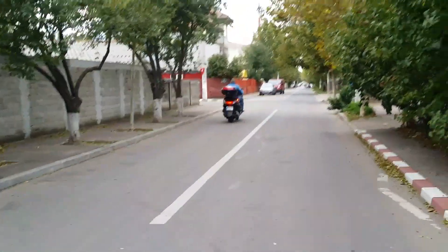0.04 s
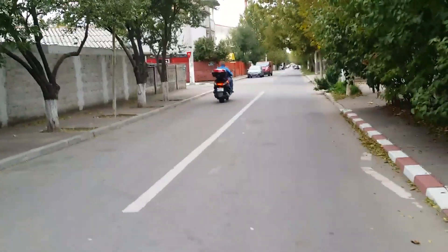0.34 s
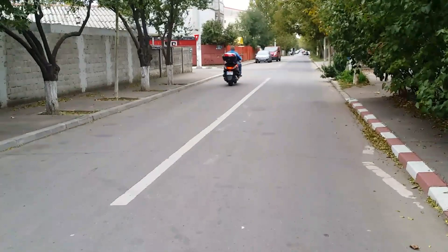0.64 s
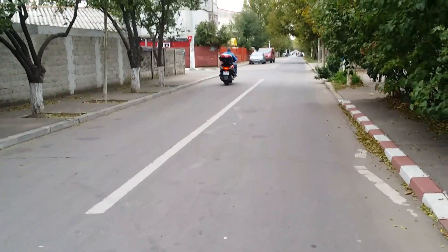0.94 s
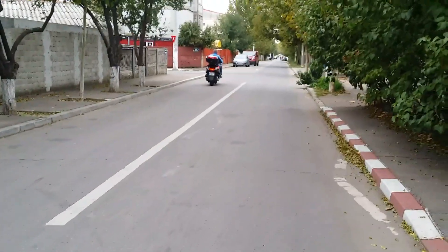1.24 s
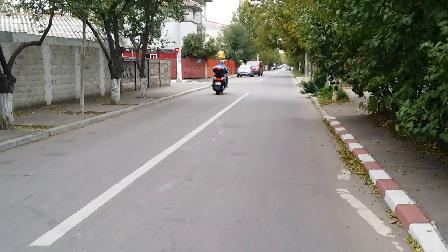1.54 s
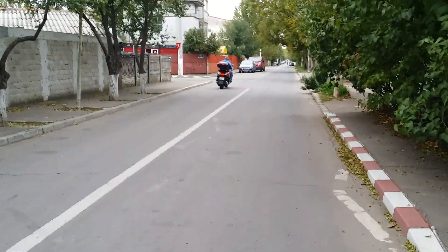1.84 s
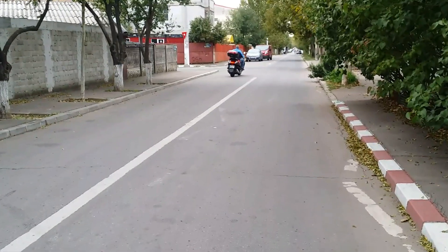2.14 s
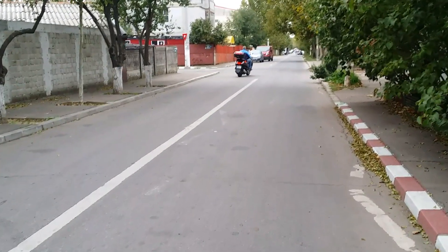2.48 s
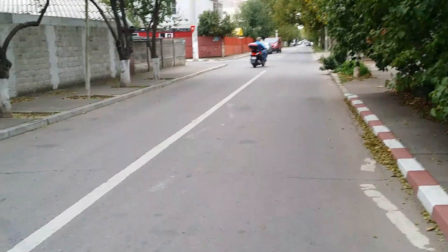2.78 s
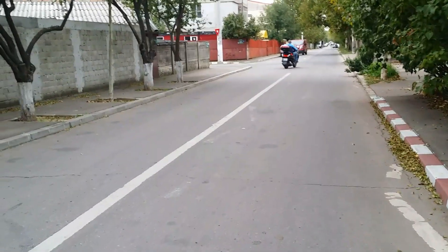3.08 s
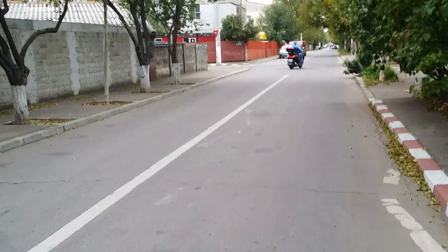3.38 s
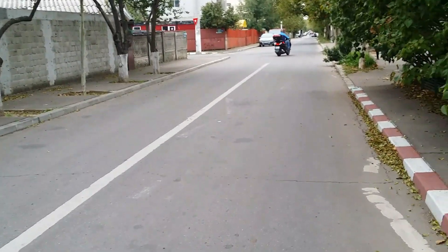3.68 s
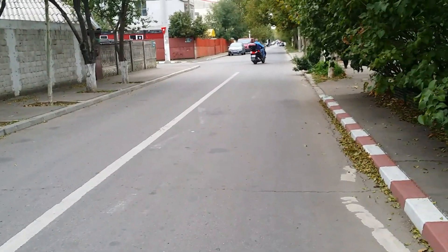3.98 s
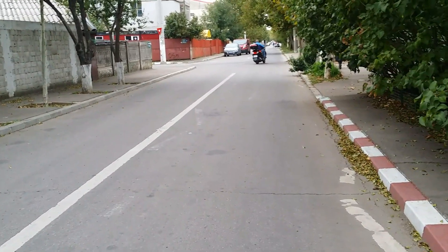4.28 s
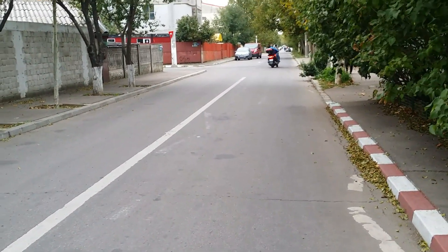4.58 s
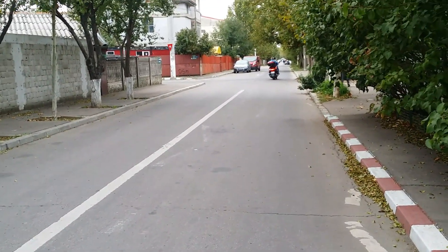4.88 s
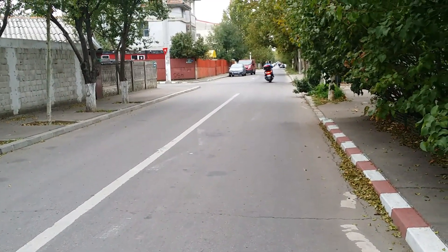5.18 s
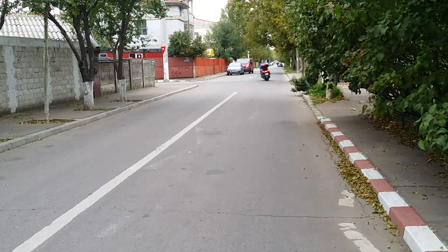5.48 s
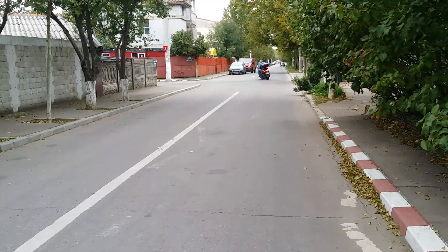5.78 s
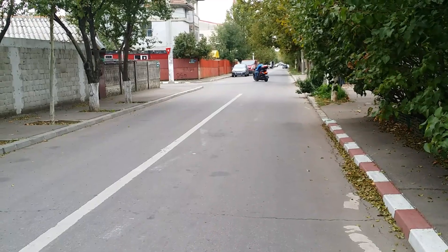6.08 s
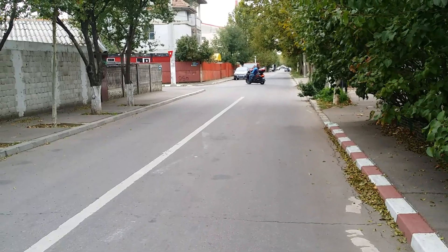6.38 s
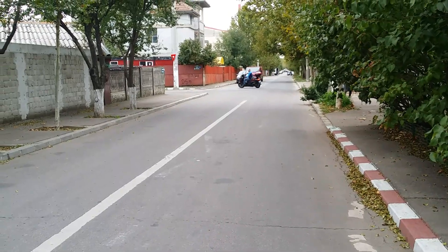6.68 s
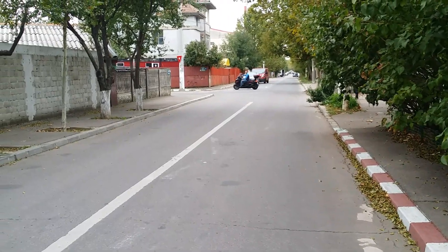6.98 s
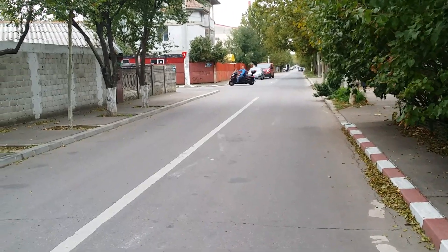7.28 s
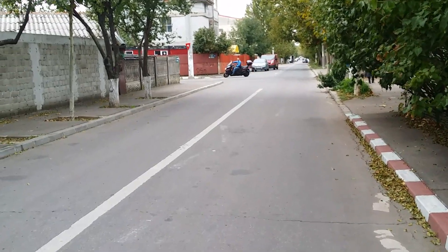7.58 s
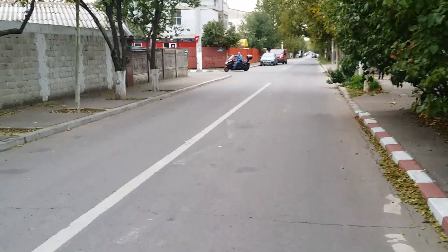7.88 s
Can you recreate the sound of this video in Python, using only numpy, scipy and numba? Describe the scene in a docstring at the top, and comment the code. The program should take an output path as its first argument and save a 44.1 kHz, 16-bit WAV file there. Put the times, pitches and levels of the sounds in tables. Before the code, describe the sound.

A single-cylinder scooter with an open exhaust rolls away along a walled street, heard from behind and slightly to the right. From the start it putters loudly, about sixteen separate pops a second, each a deep thump with a raspy bark and occasional sharper cracks. Faint valve ticks are audible early on. At about 2.5 seconds a throttle blip lifts the pitch with a cluster of bangs, then the engine slows and softens. A second blip bangs at about 4 seconds. From 4.5 to 6.5 seconds it settles into a slower, thinner, hollow chug farther off. A third blip cracks at about 6.7 seconds and falls away; the sound brightens and picks up slightly toward 8 seconds as the scooter begins turning. Walls and houses return short echoes with a soft tail throughout, over a whirr of drive and tyres and faint distant traffic.

```python
"""A single-cylinder scooter with an open exhaust rolls away down a walled street and starts to turn.
Every firing is a separate pop: a deep thump of gas, a bark from the ringing pipe and a rasp at its
mouth. Three blips of the throttle make it bang. Walls, a fence and houses throw each pop back, with
delays that shift as it rides, and trees scatter a soft tail. Underneath, the valves tick, the intake
gulps air, the drive, fan and tyres whirr, and far traffic rumbles."""
import sys
import numpy as np
from scipy import signal
from scipy.fft import rfft, irfft
from scipy.io import wavfile
from numba import njit

SR = 44100
rng = np.random.default_rng(int(sys.argv[2]) if len(sys.argv) > 2 else 0)


def int16_out(signal):
    """Quantize to a 16-bit WAV file."""
    q = np.round(np.clip(np.atleast_2d(signal).T, -1, 1) * 32767)
    wavfile.write(sys.argv[1], SR, q.astype(np.int16))


N = 354123
TIME = np.arange(N) / SR
MS = 1 / 1000
EAR_GAP_MS = 0.45   # time sound takes from one ear to the other


def from_db(db):
    """Turn decibels into a gain."""
    return 10 ** (np.asarray(db) / 20)


def rms_one(x):
    """Scale a signal to an average power of 1."""
    return x / np.sqrt(np.mean(x ** 2) + 1e-20)


def in_time(rows, at=TIME):
    """Glide between a table's rows: one curve for each column after the time."""
    seconds, *columns = np.transpose(rows)
    return [np.interp(at, seconds, column) for column in columns]


def cut(x, hz, kind, order=2):
    """Keep the "low" or the "high" side of a frequency."""
    return signal.sosfilt(signal.butter(order, min(hz, .45 * SR), kind, fs=SR, output="sos"), x + 1e-18)


def resonate(x, hz, width_hz):
    """One resonance, with a gain of 1 at its peak."""
    r = np.exp(-np.pi * width_hz / SR)
    feedback = [1, -2 * r * np.cos(2 * np.pi * hz / SR), r * r]
    return signal.lfilter(np.array([1, 0, -1]) * (1 - r * r) / 2, feedback, x + 1e-18)


@njit
def gliding_filter(x, tuning, damping):
    """A filter whose pitch may move; returns the band at that pitch and the highs above it."""
    band, high, a, b = np.zeros(len(x)), np.zeros(len(x)), 0., 0.
    for i in range(len(x)):
        g = tuning[i]
        high[i] = (x[i] - (damping + g) * a - b) / (1 + g * (damping + g))
        band[i] = a + g * high[i]
        a, b = a + 2 * g * high[i], b + 2 * g * band[i]
    return damping * band, high


def noise(spectrum):
    """Noise of a given tone colour, with a power of 1."""
    hz, db = np.transpose(spectrum)
    colour = from_db(np.interp(np.log(np.fft.rfftfreq(N, 1 / SR) + 1), np.log(hz), db))
    return rms_one(irfft(rfft(rng.standard_normal(N)) * colour, N))


def stereo_noise(spectrum):
    """A separate noise for each ear."""
    return np.array([noise(spectrum), noise(spectrum)])


def delayed(x, ms):
    """Play a signal late by a steady or moving delay."""
    return np.interp(TIME - ms * MS, TIME, x, left=0)


def clicks(times, sizes):
    """One sample of the given size at each time."""
    return np.bincount(np.clip(times * SR, 0, N - 1).astype(int), sizes, N)


def bursts(kicks, decay_ms):
    """A level that jumps at each click and dies away."""
    return signal.lfilter([1], [1, -np.exp(-1 / (decay_ms * MS * SR))], kicks + 1e-18)


# The colour of far traffic. Each row: frequency in Hz, relative level in dB.
TRAFFIC_COLOUR = [(20, 0.5), (40, -6), (70, 3.5), (150, -5), (400, 10.5), (1500, -59)]

def traffic(level_db=-42.0):
    """Far traffic makes a steady, low rumble."""
    return from_db(level_db) * noise(TRAFFIC_COLOUR)


# Brief hisses. Each row: middle and half length in seconds, level in dB, pitch and width in Hz.
HISSES = [(0.204, 0.041, -38, 12100, 7000), (1.547, 0.2, -47.5, 3440, 1800), (7.067, 0.016, -34, 1300, 500),
          (7.08, .04, -48, 2800, 2000), (7.533, 0.082, -48.5, 5500, 6500)]

def swishes():
    """Bands of hiss swell and fade."""
    hiss, out = rng.standard_normal((2, N)), 0
    for middle_s, half_s, db, hz, width_hz in HISSES:
        swell = np.exp(-((TIME - middle_s) / half_s) ** 2)
        band = rms_one(resonate(resonate(hiss, hz, width_hz), hz, width_hz))
        out = out + from_db(db) * swell * band
    return out


# The colour of the whirr. Each row: frequency in Hz, relative level in dB.
WHIRR_COLOUR = [(250, -1), (420, 10.5), (680, 12), (950, 13), (1200, 5.5), (1500, 3), (2200, 6),
                (3100, -7.5), (6600, -8.5), (9000, -6), (12000, -10.5), (15500, -16.5)]

def whirr(base_db=-28.0, follow=1.67):
    """Drive, fan and tyres whirr louder as the engine works harder."""
    return from_db(base_db + follow * in_time(ENGINE_EFFORT)[0]) * stereo_noise(WHIRR_COLOUR)


# How hollow the street sounds. Each row: time in seconds, depth of the dips from 0 to 1.
HOLLOWNESS = [(0, 0), (2.6, 0.01), (2.8, 0.47), (3.9, 0.38), (4.15, 0), (4.4, 0.43), (6.5, 0.64), (6.7, .2),
              (7.2, 0.3), (7.6, 0.1)]
# The dips in the tone. Each row: frequency in Hz, width in Hz.
HOLLOW_DIPS = [(462, 100), (990, 150), (1500, 160)]

def hollowed(x):
    """The sound turns hollow while the scooter is far down the street."""
    depth, = in_time(HOLLOWNESS)
    for hz, width_hz in HOLLOW_DIPS:
        x = x - depth * resonate(x, hz, width_hz)
    return x


def afterglow(times, level_db, t60, build_ms=3.0):
    """The level of each pop's tail among the trees: it builds, then falls 60 dB in t60 seconds."""
    decay_ms = t60 / MS / np.log(1e6)
    power = bursts(bursts(clicks(times, from_db(level_db) ** 2), decay_ms), build_ms)
    return np.sqrt(power / (build_ms * MS * SR))


def foliage(x, t60, build_ms=12.0, ear_gap_ms=0.44, directions=7, block=8192):
    """Trees and fences scatter a tail from all sides; it changes as the scooter moves on."""
    t, field, out = TIME[:SR], 0, np.zeros((2, N + 2 * SR))
    envelope = from_db(-60 * t / t60) * (1 - np.exp(-(t / (build_ms * MS)) ** 2))
    # each direction has its own lag between the ears
    for lag in np.linspace(-1, 1, directions) * ear_gap_ms * MS * SR / 2:
        arrivals = rng.standard_normal(N + SR)
        field = field + np.array([np.roll(arrivals, -int(lag)), np.roll(arrivals, int(lag))])
    for i in range(0, N, block):
        echoes = rms_one(envelope * field[:, i:i + SR]) / np.sqrt(SR)
        tail = signal.fftconvolve(x[None, i:i + block], echoes, axes=1)
        out[:, i:i + tail.shape[1]] += tail
    return out[:, :N]


def scatter(thumps, times, sharp_db, bass_db=-1.5, hiss_db=-29.5):
    """Tails of the thump and the rasp: leaves scatter little deep bass and soak up most treble."""
    bass = cut(cut(foliage(thumps, t60=0.63), 130.0, "high"), 363.0, "low", order=8)
    hiss = stereo_noise(RASP_COLOUR) * afterglow(times, sharp_db + hiss_db, t60=0.77)
    return from_db(bass_db) * bass + hiss


# The echo off the house ahead. Each row: time in seconds, delay in milliseconds, gain in dB.
END_HOUSE_ECHO = [(0, 103, -21), (2.6, 86, -16), (4.12, 77, -22), (4.18, 76, -3), (4.4, 79, -11),
                  (5.1, 64, -12), (6.6, 41.5, -14.5), (7.1, 37, -18.5)]

def house_ahead(x):
    """The house at the end of the street sends back a thin slap, sooner as the scooter nears it."""
    delay_ms, db = in_time(END_HOUSE_ECHO)
    thin = resonate(cut(x, 647.0, "high", order=4), hz=900.0, width_hz=900.0)
    return from_db(db) * delayed(thin, delay_ms)


# Four echoes from the sides. Each row: time in seconds, delay in milliseconds, gain in dB.
WALL_ECHO = [(0.0, 9.4, -3), (1.2, 8.8, 1.3), (2.4, 7.3, 0.6), (3.6, 6.46, -1.5), (4.0, 7.9, -15),
             (4.4, 7.7, -2.5), (4.8, 8, 0), (5.7, 6.97, -2), (6.3, 5.2, -14.5), (6.9, 3.88, -8.5),
             (8.03, 6.3, -11)]
FENCE_ECHO = [(0.0, 29.46, -2.5), (1.2, 24.4, -5.5), (2.4, 20.64, -5.5), (3.6, 19.76, -7),
              (4.5, 19.84, -12), (5.0, 22.6, -5.5), (6.0, 21.26, -4.5), (6.9, 22, -6), (7.4, 24.13, 0),
              (8.03, 26.7, -7.5)]
HOUSES_ECHO = [(0.0, 40.84, -11.5), (1.2, 37.45, -4.5), (2.4, 33.55, -9.5), (3.6, 27.62, -5),
               (4.5, 23.28, -4), (5.5, 26.03, -16.5), (6.9, 26.35, -7), (8.03, 30.9, -9)]
SIDE_STREET_ECHO = [(4.4, 41.5, -14), (4.8, 38.4, -6), (6.4, 36.3, -10), (7.0, 38, -13), (8.03, 42.7, -8.5)]

def street_echoes(low, mid, high, mid_db=-3.5, high_db=-2.5):
    """The detour by each wall changes as the scooter rides; rough surfaces return less treble."""
    sound, out = low + from_db(mid_db) * mid + from_db(high_db) * high, 0
    walls = (WALL_ECHO, -0.42), (FENCE_ECHO, 0.47), (HOUSES_ECHO, 0.65), (SIDE_STREET_ECHO, -0.39)
    for wall, side in walls:   # side runs from -1 (left) to 1 (right)
        delay_ms, db = in_time(wall)
        ears = [delayed(sound, delay_ms + ear * side * EAR_GAP_MS / 2) for ear in (1, -1)]
        out = out + from_db(db) * np.array(ears)
    return out


# The fence's bright echo. Each row: time in seconds, bark gain in dB, rasp gain in dB.
FENCE_SLAP = [(6.6, -44, -38), (6.869, -6, -7), (7.45, -13, 6), (8.03, 3, 6)]

def fence_slap(mid, high):
    """In the turn the pipe points at the fence, which slaps its treble back."""
    mid_db, high_db = in_time(FENCE_SLAP)
    sound = from_db(mid_db) * mid + from_db(high_db) * high
    delay_ms = in_time(FENCE_ECHO)[0]
    return np.array([delayed(sound, delay_ms + EAR_GAP_MS / 4), delayed(sound, delay_ms)])


# How far off the scooter sounds: higher values thin the thump, blunt the bark and fade the ticks.
# Each row: time in seconds, farness as a plain number.
FARNESS = [(0, 18.8), (1.2, 20.3), (2.4, 19), (3.5, 32), (4.5, 47), (5.6, 54), (6.6, 43.6), (7.5, 30),
           (8.03, 31)]

def thinned(thumps, split_hz=190.0, tilt_db_per_step=0.284, neutral_farness=34.9):
    """The thump is deep nearby and grows thinner with distance."""
    deep = cut(thumps, split_hz, "low", order=1)
    tilt_db = tilt_db_per_step * (neutral_farness - in_time(FARNESS)[0])
    return from_db(tilt_db) * deep + from_db(-tilt_db) * (thumps - deep)


# The pitches at which the valve gear rings, in Hz.
VALVE_PITCHES = [9400, 10500, 11600, 12300, 13500]

def valves(times, level_db=-16.0, spread_db=7.0, width_hz=330.0, fade_db_per_step=5.1):
    """The valve gear ticks as each pop begins; the fine ring is soon lost with distance."""
    farness, = in_time(FARNESS, times)
    tick_db = level_db - fade_db_per_step * (farness - farness[0])
    chance_db = spread_db * np.clip(rng.standard_normal((len(times), len(VALVE_PITCHES))), -2, 2)
    ticks = sum(resonate(clicks(times, from_db(tick_db + luck_db)), hz, width_hz)
                for hz, luck_db in zip(VALVE_PITCHES, chance_db.T))
    return ticks * from_db([[1], [-1]])


# The intake is louder when the scooter is side-on. Each row: time in seconds, relative level in dB.
INTAKE_LEVEL = [(0, -35.5), (1.5, -42), (2.3, -47), (2.8, -65), (6.6, -58.5), (6.9, -44.5), (7.4, -39.5),
                (8.03, -34)]

def intake(times, hz=998.0, width_hz=470.0, decay_ms=7.9, lag_ms=2.4, trim_db=-6.0):
    """Each cycle draws a rough gulp of air through the air box."""
    gulps = rng.standard_normal(N) * bursts(clicks(times + lag_ms * MS, np.ones(len(times))), decay_ms)
    air_box = rms_one(resonate(resonate(gulps, hz, width_hz), hz, width_hz))
    return from_db(in_time(INTAKE_LEVEL)[0] + trim_db) * air_box


# The colour of the rasp. Each row: frequency in Hz, relative level in dB.
RASP_COLOUR = [(1500, -11), (2600, 4), (3900, 9), (5000, 6), (6600, 5.5), (9000, 1.5), (15500, -15)]

def rasp(times, level_db, snap_db=-12.5):
    """The jet of gas snaps and tears at the pipe's mouth for a few milliseconds."""
    kicks = clicks(times, from_db(level_db))
    envelope = bursts(kicks, decay_ms=5) + from_db(snap_db) * bursts(kicks, decay_ms=1)
    return stereo_noise(RASP_COLOUR) * envelope


def wavefront(times, level_db, gain_db=15.0):
    """The steep front of each pop leaves the mouth as a dry click, before the pipe rings."""
    fronts = clicks(times, from_db(level_db + gain_db))
    return -cut(cut(fronts, 600.0, "high"), 2690.0, "low", order=4)


# Hard pops and throttle bangs. Each row: start in seconds, thump strength in dB,
# bark strength in dB, pitch of the crack in Hz, crack strength in dB.
HARD_POPS = [(0.2542, -5.5, -25.5, 1660, -35), (0.373, -5, -24, 1710, -30), (0.4327, -6, -23, 1710, -25),
             (0.9219, -6, -22.5, 1690, -20), (1.103, -5, -23, 1600, -30), (1.352, -6.5, -22, 1720, -20),
             (1.592, -3.5, -20.5, 1627, -20), (1.831, -5.5, -24, 2100, -26),
             (1.9523, -5.5, -25, 1680, -20.5), (2.1321, -5, -24.5, 1685, -18.5),
             (2.3055, -5.5, -21, 1630, -22), (2.4235, -5.5, -15.5, 1740, -13),
             (2.474, -7.5, -14, 1900, -13), (2.524, -5.5, -16, 1736, -21), (2.5725, -6.5, -20, 1810, -17.5),
             (2.62, -8, -28, 700, -34), (2.9832, -11, -35, 1660, -34), (3.2241, -11.5, -31.5, 1280, -28),
             (3.4309, -11.5, -31.5, 1210, -31.5), (3.8455, -3.5, -26.5, 1170, -32),
             (3.7058, -6, -27.5, 1200, -25.5), (3.987, -2, -21, 1190, -18.5),
             (4.0472, -3.5, -12, 1230, -9.5), (4.0969, -3.5, -13, 1240, -17),
             (4.3646, -10, -30.5, 1300, -47), (6.2947, -7, -26, 1190, -26.5), (6.585, -5.5, -24, 1220, -20),
             (6.6519, -4.5, -20, 1770, -15), (6.7099, -2.5, -15, 1240, -14.5), (6.865, -10, -33, 700, -35)]

def crack(lag_ms=2.8, front_db=17.0, tail_db=-1.5, ring_db=37.5, top_hz=1120.0,
          snap_db=9, steepen=0.63, crackle_db=-22.0):
    """A hard pop's front rings briefly and washes down the street; the hardest steepen into a snap."""
    times, _, bark_db, pitch_hz, crack_db = np.transpose(HARD_POPS)
    times = times + lag_ms * MS
    fronts = clicks(times, from_db(bark_db))
    ring = sum(resonate(clicks(np.array([start]), from_db([db + ring_db])), hz, width_hz=113.0)
               for start, db, hz in zip(times, crack_db, pitch_hz))
    wash = rng.standard_normal((2, N)) * afterglow(times, bark_db + tail_db, t60=0.89)
    body = cut(cut(wash - from_db(front_db) * fronts, 347.0, "high"), top_hz, "low")
    shocks = clicks(times, from_db(snap_db + crack_db + steepen * (crack_db - crack_db.max())))
    crackle = from_db(crackle_db) * rng.standard_normal((2, N)) * bursts(shocks, decay_ms=4.6)
    snap = cut(cut(shocks + crackle, 2500.0, "high"), 7360.0, "low", order=4)
    return body - cut(ring, 2 * top_hz, "low") - snap


def pipe_ring(x, tuning, damping):
    """One resonance of the pipe, filtered twice so little sound gets past on either side."""
    return gliding_filter(gliding_filter(x + 1e-18, tuning, damping)[0], tuning, 2 * damping)[0]


# The pipe's resonances. Each row: base pitch in Hz, width in Hz, relative level in dB.
PIPE_RINGS = [(500, 147, 4.5), (591.6, 123, 2.5), (713, 111, 4), (848, 95, -7), (1203, 294, -2),
              (1710, 380, -4.5), (2330, 176, -9)]
# Hot gas raises the pipe's pitch; on a shut throttle its third resonance rings hollow.
# Each row: time in seconds, pitch multiplier, boost of that resonance in dB.
PIPE_DRIFT = [(0, 0.97, 0.5), (.55, 0.89, 5), (1.1, 0.96, -6), (2.2, 0.96, 2.5), (2.42, 1.03, -2),
              (2.48, 0.97, 5), (2.53, 0.987, 2), (2.9, 0.96, 9), (3.6, 1.044, -3), (4.1, 0.96, 4),
              (4.5, 0.975, 3.5), (5.2, 1.03, -4.5), (6.4, 0.97, 0.5), (7.1, 0.96, 1), (8.03, 0.89, -4.5)]

def bark(times, thump_db, bark_db, lowest_db, front_db=34.5, low_swirl_db=6.0, high_swirl_db=13.5,
         follow=0.49, slug_db=-6.5, tail_db=1.0, blunt_db_per_step=0.9, top_hz=3150.0):
    """A steep front and the swirling gas behind it ring the pipe; returns the bark and its tail."""
    gas, direct, tail = rng.standard_normal(N), 0, 0
    left, right, shared = rng.standard_normal((3, N))
    pitch_ratio, hollow_db = in_time(PIPE_DRIFT)[0], in_time(PIPE_DRIFT, times)[1]
    # the low resonances also follow the mass of gas in the thump
    body_db = follow * (thump_db + slug_db) + (1 - follow) * bark_db
    farness, = in_time(FARNESS)
    blunted_db = front_db - blunt_db_per_step * (farness - farness[0])
    for k, (hz, width_hz, db) in enumerate(PIPE_RINGS):
        is_low = hz < 1000
        if is_low:   # low neighbours swing in opposite directions
            pop_db, push_db, swirl_db, sign = body_db, front_db, low_swirl_db, (-1) ** k
        else:
            pop_db, push_db, swirl_db, sign = bark_db, blunted_db, high_swirl_db, 1
        level_db = pop_db + db + lowest_db * (k == 0)
        kicks = clicks(times, from_db(level_db + hollow_db * (k == 2)))
        drive = from_db(swirl_db) * gas * bursts(kicks, decay_ms=8.6) - from_db(push_db) * kicks
        wash = rms_one(np.array([left, right]) + is_low * shared)
        wash *= afterglow(times, level_db + tail_db, t60=0.6)
        tuning = np.tan(np.pi * hz * pitch_ratio / SR)
        direct = direct + sign * pipe_ring(drive, tuning, width_hz / hz)
        tail = tail + sign * np.array([pipe_ring(side, tuning, width_hz / hz) for side in wash])
    return cut(direct, top_hz, "low", order=6), cut(tail, top_hz, "low", order=6)


# The throttle sets how deep the puff is. Each row: time in seconds, the thump's lower edge in Hz.
THUMP_EDGE = [(0, 99.6), (.6, 101.6), (1.4, 110.5), (2.1, 127), (2.8, 118.3), (3.1, 103.5), (3.6, 105.4),
              (3.95, 99.6), (4.4, 105), (4.95, 104), (5.4, 85.2), (6.5, 83), (7.3, 87), (8.03, 103.3)]

def thump(times, level_db):
    """Each firing pushes a slug of gas out of the pipe with a deep boom."""
    def shape(x, edge_hz):
        x = cut(x, 255.5, "low", order=5)   # the valve opens softly
        for damping in (2.28, 0.72):   # the small mouth gives off no deep bass
            x = gliding_filter(x, np.pi * edge_hz / SR, damping)[1]
        return x - resonate(x, hz=412.6, width_hz=174.0)   # the pipe cancels a band above the boom
    edge_hz, = in_time(THUMP_EDGE)
    one_thump = shape(signal.unit_impulse(SR), np.full(SR, edge_hz.mean()))
    return shape(clicks(times, from_db(level_db)), edge_hz) / np.abs(one_thump).max()


# How fast the engine runs. Each row: time in seconds, firings per second.
ENGINE_SPEED = [(0.0, 16.604), (0.45, 16.44), (0.85, 16.413), (1.25, 16.288), (1.5, 16.803), (1.85, 16.511),
                (2.33, 17.048), (2.45, 19.588), (2.6, 20.993), (3.0, 17.63), (3.23, 14.665), (3.6, 14.454),
                (3.98, 14.218), (4.08, 21.306), (4.2, 18.458), (4.55, 17.021), (4.92, 14.612),
                (5.02, 14.644), (5.1, 13.71), (5.5, 13.92), (5.75, 13.107), (6.3, 13.883), (6.62, 13.999),
                (6.7, 19.323), (7.2, 17.431), (7.63, 14.427), (8.03, 16.651)]
# How hard it works. Each row: time in seconds, thump strength in dB, bark strength in dB.
ENGINE_EFFORT = [(0.0, -5.5, -29.5), (0.6, -5, -25), (1.4, -6, -25.0), (2.15, -5.5, -22),
                 (2.6, -9.5, -36.5), (2.72, -11.5, -33), (3.1, -13.5, -39.5), (3.55, -11.5, -30.5),
                 (3.8, -7, -29.5), (4.1, -7.5, -23), (4.2, -12.5, -36), (4.75, -11.5, -31), (5.05, -8, -29),
                 (6.62, -8, -29), (6.79, -10.5, -35.5), (7.15, -8.5, -30), (7.72, -8.5, -32.5),
                 (8.03, -5.5, -31.5)]

def firings(first_pop_s=0.0115, thump_spread_db=0.35, bark_spread_db=2.0):
    """One pop per engine cycle, no two burning alike; returns times, thump dB and bark dB."""
    cycles = np.cumsum(in_time(ENGINE_SPEED)[0]) / SR
    times = first_pop_s + np.interp(np.arange(cycles[-1] - .5), cycles, TIME)
    chance_db = rng.standard_normal((len(times), 2)) * [thump_spread_db, bark_spread_db]
    pops = np.column_stack([times, np.transpose(in_time(ENGINE_EFFORT, times)) + chance_db])
    for bang in HARD_POPS:   # each replaces the nearest ordinary pop
        pops[np.argmin(np.abs(times - bang[0]))] = bang[:3]
    return pops.T


# The pipe's mouth swings away from the listener.
# Each row: time in seconds, treble gain in dB, gain of the lowest resonance in dB.
PIPE_AIM = [(0, 6, 5.5), (.8, -3.5, 1.5), (2.1, -6, -1), (2.5, -9.5, 1), (2.8, -11, -4.5),
            (3.5, -13.5, -7.5), (4.1, -24, 3.5), (4.4, -26, -6.5), (5.5, -8.5, -1.5), (6.4, -13.5, -3.5),
            (6.7, -18.5, 2), (7.2, -13.5, -5.5), (8.03, -4.5, -4)]

def exhaust(bang_from_db=-22.5, bang_rasp=0.29, front_lag_ms=2.392, rasp_db=-9.0, bark_beam=0.048):
    """The pops, with intake, valves and echoes; the hardest steepen into bangs with more treble."""
    times, thump_db, bark_db = firings()
    aim_db, lowest_db = in_time(PIPE_AIM, times)
    front_times = times + front_lag_ms * MS
    sharp_db = bark_db + bang_rasp * np.maximum(bark_db - bang_from_db, 0)
    low = thinned(thump(times, thump_db))
    barks, bark_tail = bark(front_times, thump_db, bark_db, lowest_db)
    mid = barks + intake(times) + wavefront(front_times, bark_db + aim_db / 2)
    high = rasp(front_times, sharp_db + aim_db + rasp_db) * from_db([[1], [-1]])
    # the mouth beams its treble, so turning away dulls the direct sound but not the tail
    beamed = mid * from_db(bark_beam * in_time(PIPE_AIM)[0]) * from_db([[-1.4], [1.4]])
    direct = low + beamed + high + valves(times)
    echoes = street_echoes(low, mid, high[0]) + fence_slap(mid, high[0])
    return direct + echoes + bark_tail + scatter(low, front_times, sharp_db)


def scene():
    """The scooter in its street, slightly to the right."""
    pops = exhaust() + crack()
    background = whirr() + swishes() + traffic()
    return hollowed(pops + house_ahead(pops.mean(axis=0)) + background) * from_db([[-.35], [.35]])


def record(dry, shelf_hz=7310.0, shelf_db=-13.0, stop_hz=16400):
    """The tallest peaks are rounded, the microphone dulls the treble, and the very top is cut."""
    rounded = dry / (1 + dry ** 8) ** (1 / 8)
    hz = np.fft.rfftfreq(N, 1 / SR)
    treble_share = 1 - 1 / (1 + (hz / shelf_hz) ** 20)
    dull = irfft(rfft(rounded) * from_db(shelf_db * treble_share), N)
    return signal.sosfilt(signal.cheby2(14, 70, stop_hz, fs=SR, output="sos"), dull)


dry = scene()
out = record(dry)
int16_out(out)
```